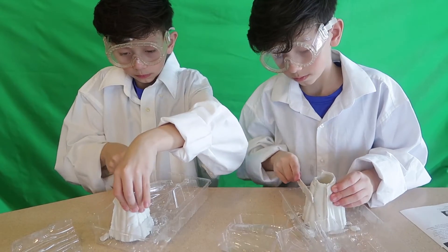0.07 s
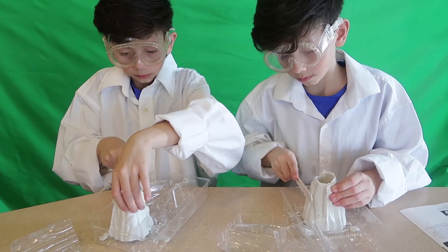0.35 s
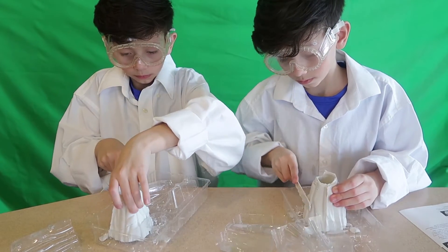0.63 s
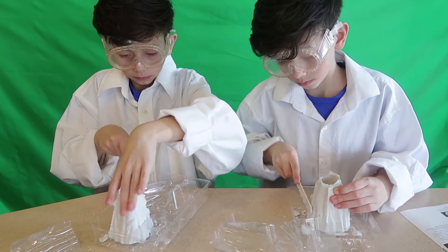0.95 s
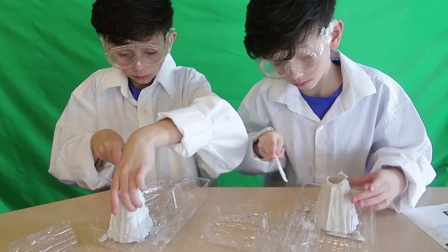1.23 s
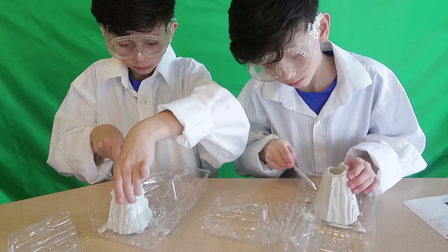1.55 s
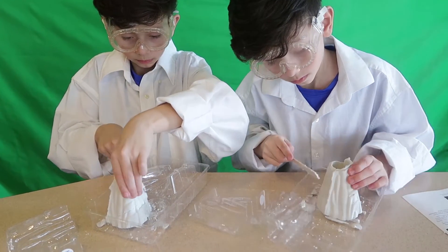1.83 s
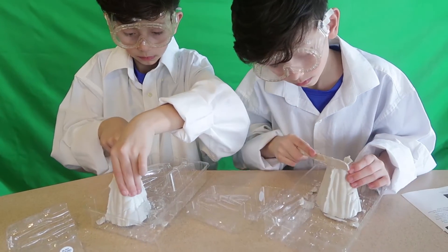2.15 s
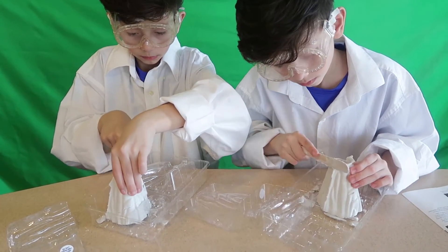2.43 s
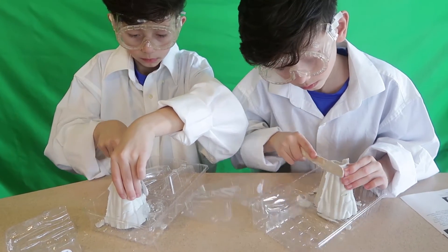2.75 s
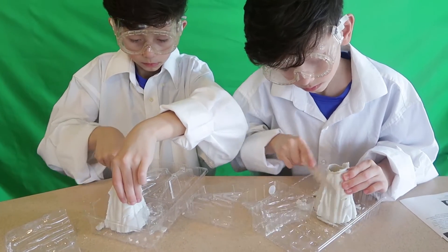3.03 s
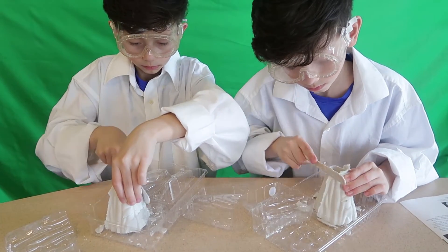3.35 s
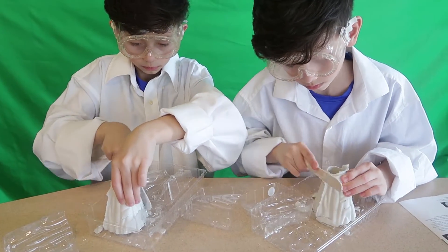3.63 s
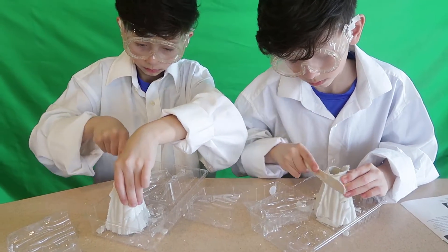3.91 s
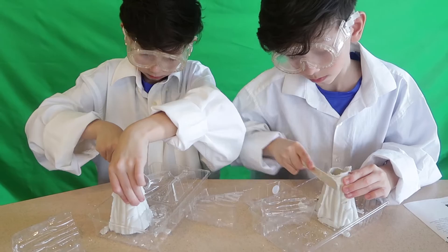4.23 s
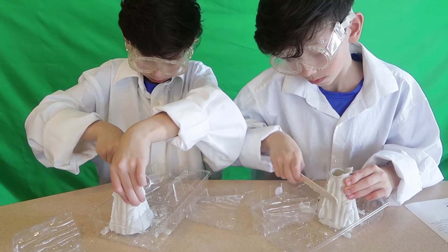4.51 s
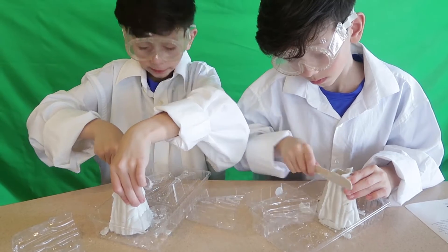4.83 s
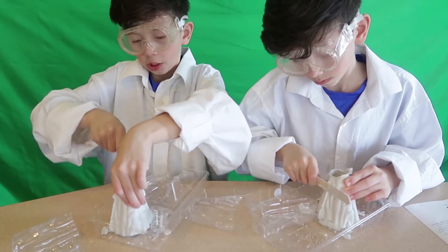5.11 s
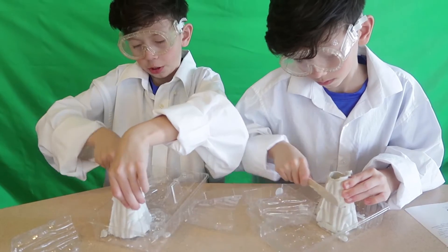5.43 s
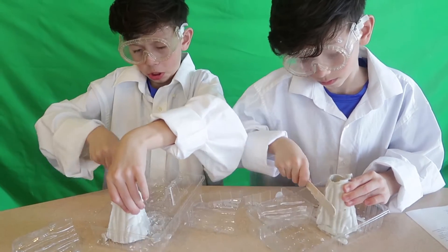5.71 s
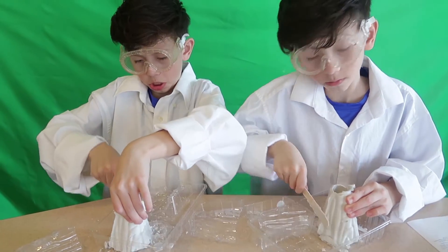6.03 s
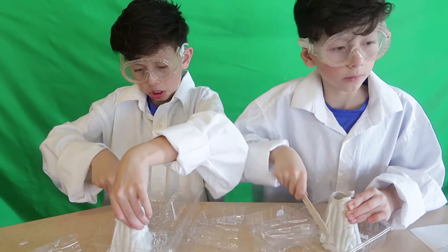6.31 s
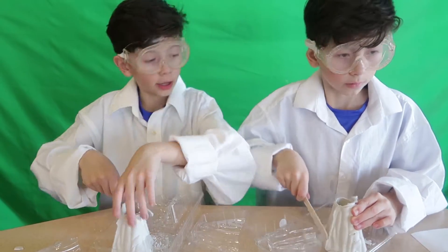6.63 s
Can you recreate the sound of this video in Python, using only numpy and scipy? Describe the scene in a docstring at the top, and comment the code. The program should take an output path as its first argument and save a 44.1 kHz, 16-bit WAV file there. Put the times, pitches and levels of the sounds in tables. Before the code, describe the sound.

Wooden sticks scrape dry plaster in short, gritty strokes, with sharp snaps, small taps and crinkling plastic in a small room.

```python
"""Dry, gritty scraping and sharp snaps: two wooden sticks work at plaster casts in thin plastic trays.
Each stroke is a run of tiny slips that sometimes squeaks; now and then a stick snaps off a ridge and
knocks the tray, the hardest knocks overloading the close microphone. The casts rock with hollow bumps,
the table thumps and the trays crinkle. A small live room answers, over a faint mains drone and a low
hum that comes and goes."""
import sys
import numpy as np
from scipy import signal
from scipy.fft import rfft, irfft, next_fast_len
from scipy.io import wavfile
from scipy.ndimage import map_coordinates

SR = 44100
rng = np.random.default_rng(int(sys.argv[2]) if len(sys.argv) > 2 else 0)


def output_pcm(signal):
    """Save a mono or channel-first signal as 16-bit PCM at the path in sys.argv[1].

    Samples are clipped to [-1, 1] before scaling.
    """
    pcm = np.clip(np.atleast_2d(signal).T, -1, 1) * 32767
    wavfile.write(sys.argv[1], SR, np.round(pcm).astype(np.int16))


N = 298113

# Stereo width of the room's answer. Each row: frequency in Hz, side level against mid in dB.
ROOM_WIDTH = [(60, -30), (110, -46), (200, -55), (380, -18), (700, -33), (1290, -19.5), (2380, -12.5),
              (4400, -6.5), (8120, -1), (15000, 5)]
SWELL_SHARE = 0.23  # an ordinary stroke swells over this share of its length
CREST_DB = 22.5  # a knock's peak stands about this far over its rms


def scraping(usual_pressure_db=-43.5):
    """Stroke after stroke: a light touch hisses and bumps, a firm one bites sooner and has more body."""
    # Each row: start in seconds, length in seconds, pressure in dB, extra grit of that patch in dB.
    strokes = [(0.0, 0.0098, -36.5, 5), (0.096, 0.054, -61.5, 5.5), (0.257, 0.037, -59, 4.5),
               (0.37, 0.054, -50.5, 0), (0.555, 0.091, -52, 1.5), (0.638, 0.023, -39, 6.5),
               (0.682, 0.082, -31, 2.5), (0.79, 0.14, -31, 0), (0.979, 0.14, -30, 2),
               (1.165, 0.069, -32.5, -2.5), (1.797, 0.13, -47.5, 6.5), (1.861, 0.058, -35, -6),
               (1.962, 0.031, -41.5, -3), (2.075, 0.023, -64, -24), (2.49, 0.14, -48.5, -1),
               (2.643, 0.031, -32, -11), (2.791, 0.031, -43, 1.5), (2.849, 0.036, -33.5, 5),
               (2.888, 0.17, -30.5, 4), (2.973, 0.019, -23.5, -1), (3.587, 0.091, -53, -3),
               (3.77, 0.043, -45, -2), (3.868, 0.11, -46, -8), (4.03, 0.038, -48, -1.5),
               (4.205, 0.042, -47.5, -6), (4.29, 0.066, -41, 2), (4.511, 0.026, -30.5, -9),
               (4.834, 0.054, -56.5, -9), (5.429, 0.13, -51, -3), (5.491, 0.041, -43, 4),
               (5.708, 0.076, -36.5, 3), (5.868, 0.14, -47.5, 1), (5.997, 0.072, -36.5, 2.5),
               (6.088, 0.051, -65, -9), (6.232, 0.16, -41.5, 2.5), (6.404, 0.052, -51, -0.5),
               (6.48, 0.25, -56.5, -0.5), (6.627, 0.053, -43.5, -2.5), (6.715, 0.024, -37, 2)]
    out = np.zeros((2, N))
    for start, length, pressure_db, extra_grit_db in strokes:
        harder_db = pressure_db - usual_pressure_db
        thud_db = -6 - 0.58 * harder_db
        grit_db = -8 - 0.63 * harder_db + extra_grit_db
        swell = np.clip(SWELL_SHARE - 0.0086 * harder_db, 0.05, 0.9)
        stroke = amp(pressure_db) * scrape(length, thud_db, grit_db, swell)
        add(out, start, in_room(stroke, wet_db=-1.5, lead_s=-14e-6))
    return out


def scrape(length, thud_db, grit_db, swell, release_s=0.035, powder_db=-4, judder_db=2, crumb_db=6):
    """The stick catches and slips on grains of plaster; crushed powder hisses and crumbs crack off."""
    # Tone of scraped plaster. Each row: frequency in Hz, level in dB.
    plaster_spectrum = [(53, -76), (90, -1.5), (335, -3), (381, -3), (493, -11), (1090, -3), (1270, -6.5),
                        (1870, -11), (2130, -14), (2700, -14), (2880, -16.5), (6680, -21), (12500, -30),
                        (15500, -60)]
    t = np.arange(0, length + release_s, 1 / SR)
    slips = unit(rattle(t, per_s=620))
    powder = amp(powder_db) * rng.standard_normal(len(t))
    force = (slips + powder) * amp(judder_db * wobble(56.7, len(t)))
    thud, body, grit = registers(tray(coloured(force, plaster_spectrum), ring_db=-10.5))
    grit = unit(grit + amp(crumb_db) * crumbs(t))
    easing = amp(2.5 * (0.5 - t / length))  # the hand eases off along the stroke
    touch = gate(t, length, swell * length, release_s) * easing
    return touch * (amp(thud_db) * thud + body + amp(grit_db) * grit)


def crumbs(t, per_s=55, pitch_hz=3600, pitch_spread=0.324, ring_t60=0.0061, scatter_db=10.5):
    """Crumbs of plaster crack off at random, each with a tiny ring of its own pitch."""
    out = np.zeros(len(t))
    for start in t[rng.random(len(t)) < per_s / SR]:
        pitch, size = np.clip(rng.standard_normal(2), -2, 2)
        hz = pitch_hz * np.exp(pitch_spread * pitch)
        age = np.maximum(t - start, 0)
        out += amp(scatter_db * size) * decay(age, ring_t60) * np.sin(2 * np.pi * hz * age)
    return out


def squeaking(edge_s=0.0061, waver_share=0.042, flutter_db=6):
    """For a moment the slips lock to the ring of the stick and make a rough, unsteady tone."""
    # Squeaks on smooth patches. Each row: start in seconds, length in seconds, pitch in Hz, level in dB.
    squeaks = [(0.686, 0.035, 1108, -35), (0.782, 0.038, 1118, -28), (0.898, 0.046, 1076, -30),
               (0.987, 0.092, 1060, -29), (2.993, 0.016, 2650, -29), (4.439, 0.04, 3900, -55),
               (6.654, 0.041, 1144, -43)]
    out = np.zeros((2, N))
    for start, length, hz, db in squeaks:
        t = np.arange(0, length + edge_s, 1 / SR)
        phase = 2 * np.pi * np.cumsum(hz * (1 + waver_share * wobble(260, len(t)))) / SR
        tone = unit(np.sin(phase) * amp(flutter_db * wobble(134, len(t))))
        add(out, start, in_room(amp(db) * tone * gate(t, length, edge_s, edge_s), wet_db=-8))
    return out


def breaking(bite_s=0.04, lead_s=18e-6):
    """The stick digs in and snaps off a ridge with one short crack and a grainy tail."""
    # Each row: time of the snap in seconds, rough peak in dB, pitch in Hz, thud and grit in dB against
    # the body, level of the bite before it in dB, level of the tail after it in dB.
    breaks = [(3.0655, 0, 1110, -9.5, -12, -42, -7), (3.8326, -6.5, 1040, -20, -12, -41, -13),
              (4.512, -10.5, 990, -16, -10, -46.5, -12.5), (4.9785, 4, 1060, -11.5, -10, -41.5, -1),
              (5.619, 5, 910, -11, -11.5, -43, -5), (6.189, 1.5, 816, -11.5, -15.5, -43, -6)]
    out = np.zeros((2, N))
    for start, db, hz, thud_db, grit_db, bite_db, tail_db in breaks:
        bite = amp(bite_db) * scrape(bite_s, thud_db=0.5, grit_db=-5, swell=SWELL_SHARE)
        snap = amp(db) * knock(hz, thud_db, grit_db, stick_db=7, stick_q=3.7, ring_db=-10,
                               chatter_db=-11, chatter_t60=0.019, crunch_t60=0.027, crunch_hz=4200)
        add(out, start - bite_s, in_room(bite, wet_db=-5, lead_s=lead_s))
        add(out, start, in_room(snap, wet_db=-9, lead_s=lead_s))
        add(out, start, in_room(amp(tail_db) * snap_tail(), wet_db=-3, lead_s=lead_s))
    return out


def snap_tail(t60=0.094, rise_s=0.0041):
    """A short, dense, grainy tail after each snap, with its first reflections."""
    # Tone of the tail. Each row: frequency in Hz, level in dB.
    tail_spectrum = [(40, -29), (130, -10), (270, -4), (390, -2), (500, -5), (780, -1), (1150, 1.5),
                     (1750, -2.5), (2350, -7.5), (3200, -16), (6000, -22.5), (12000, -37), (15500, -65)]
    t = np.arange(SR // 6) / SR
    grains = rattle(t, per_s=1400) * rise(t, rise_s) * decay(t, t60)
    return amp(-CREST_DB) * unit(tray(coloured(grains, tail_spectrum), ring_db=-9))


def ticking():
    """Short ticks and taps of a stick on the cast, one of them a close echo right after a snap."""
    # Each row: start in seconds, rough peak in dB, pitch in Hz, thud and grit in dB against the body.
    ticks = [(0.37, -33.5, 1060, -7, -29), (.631, -16.5, 940, -0.5, -18), (.688, -23, 1140, -5, -15),
             (.7835, -7, 1120, -14.5, -11), (.813, -16.5, 1150, -11, -15), (.836, -14, 1120, -10, -5.5),
             (0.868, -17, 1110, -14, -11), (1.03, -14.5, 1080, -20, -21), (1.065, -8, 1000, -15, -16.5),
             (1.133, -17, 1500, -17, -16), (1.221, -29, 940, 2, -22), (1.861, -20, 1310, -30, -32),
             (1.89, -17, 804, -12, -20), (1.968, -24, 1380, -5, -13), (2.219, -31.5, 595, 8.5, -6),
             (2.342, -32.5, 794, 4, -6.5), (2.398, -28, 1190, -11, -27), (2.49, -21, 920, -6, 0),
             (2.522, -23.5, 1180, -27, -9), (2.566, -21, 1320, -32, -28), (2.651, -18, 2330, -16, 3),
             (2.677, -24.5, 1190, -30, -2), (2.854, -21.5, 1060, -17, -8), (2.9, -21.5, 1090, -8, 4),
             (2.972, -6, 1200, -11.5, -6), (3.073, -6, 710, -4, -10.5), (4.163, -28.5, 2100, -10, -7),
             (4.171, -31, 2080, -1, -10), (4.206, -30.5, 1950, 10, 9), (4.276, -28.5, 1900, 9, -3),
             (4.345, -21, 1400, -1.5, -6), (4.384, -25, 670, 4, 3.5), (4.577, -20, 900, -3, -6),
             (4.909, -24, 875, -2, 1.5), (5.054, -9, 900, -6, -8.5), (5.061, -13.5, 850, -9, -12),
             (5.088, -15, 690, -6, -5), (5.111, -12.5, 805, -6, -14), (5.711, -12, 970, 0, -9.5),
             (5.743, -23, 1010, 8, -18), (5.762, -17, 680, 8, -15), (5.814, -21, 1170, -9, -13),
             (5.962, -26.5, 1490, -20, -9), (6.116, -28.5, 1150, -13, 16), (6.1864, -7.5, 1280, -9.5, -6.5),
             (6.251, -14.5, 1140, -13, -30), (6.354, -18.5, 720, -12, -20), (6.637, -29, 786, -2, 3),
             (6.728, -25, 2400, -13, -2)]
    out = np.zeros((2, N))
    for start, db, hz, thud_db, grit_db in ticks:
        tick = knock(hz, thud_db, grit_db, stick_db=11.5, stick_q=3.26, ring_db=-14.5,
                     chatter_db=-1.5, chatter_t60=0.092, crunch_t60=0.033, crunch_hz=1800)
        add(out, start, in_room(amp(db) * tick, wet_db=-4, lead_s=-15e-6))
    return out


def knock(hz, thud_db, grit_db, stick_db, stick_q, ring_db,
          chatter_db, chatter_t60, crunch_t60, crunch_hz):
    """A push, a bright crunch of plaster and a duller chatter ring the stick briefly. Peak near 1."""
    # Tone of a knock. Each row: frequency in Hz, level in dB.
    knock_spectrum = [(35, -43), (70, -11.5), (180, -4.5), (250, 1), (385, -2.5), (480, -8.5), (780, 2),
                      (1050, -2), (1300, -1), (1560, -2), (1830, 0), (2100, -8.5), (3930, -11),
                      (10700, -27), (15500, -39.5)]
    t = np.arange(SR // 6) / SR
    push = unit(t == 0)
    crunch = rng.standard_normal(len(t)) * decay(t, crunch_t60)
    crunch = filtered(crunch, lambda f: 1j * f / (crunch_hz + 1j * f))  # high-pass
    chatter = rattle(t, per_s=800) * decay(t, chatter_t60)
    chatter = filtered(chatter, lambda f: 2400 / (2400 + 1j * f))  # low-pass
    force = push + amp(3) * unit(crunch) + amp(chatter_db) * unit(chatter)
    stick = filtered(force, lambda f: 1 + amp(stick_db) * resonance(f, hz, hz / stick_q))
    thud, body, grit = registers(tray(coloured(stick, knock_spectrum), ring_db))
    return amp(-CREST_DB) * unit(amp(thud_db) * thud + body + amp(grit_db) * grit)


def tray(x, ring_db):
    """A contact is heard directly and through the modes of the cast and its tray."""
    # Each row: frequency in Hz, bandwidth in Hz, level in dB.
    tray_modes = [(390, 15, 9), (1060, 40, 1), (1886, 63, -2), (2560, 28, -14), (3880, 1300, 2.5)]
    return filtered(x, lambda f: 1 + amp(ring_db) * modes(f, tray_modes))


def lingering_ring(start_s=1.24, level_db=-40, rise_s=0.0089, t60=0.38):
    """A faint, thin ring dies away as the stick leaves the cast after the first long scrape."""
    # Each row: frequency in Hz, bandwidth in Hz, level in dB.
    ring_modes = [(2240, 71, -5), (2590, 110, 4), (3830, 81, 0), (4070, 100, -9)]
    out = np.zeros((2, N))
    t = np.arange(SR) / SR
    ring = unit(filtered(diffuse(SR, ROOM_WIDTH), lambda f: modes(f, ring_modes)))
    add(out, start_s, amp(level_db) * ring * rise(t, rise_s) * decay(t, t60))
    return out


def bumping(t60=0.15, width_hz=380, hollow_db=-1):
    """The cast rocks on its tray; the soft contact has no crack and only wakes the low modes."""
    # Each row: start in seconds, peak in dB, pitch in Hz.
    bumps = [(1.225, -28, 230), (1.262, -48, 260), (2.086, -39, 780), (2.342, -44, 216.5),
             (3.545, -29.5, 515), (3.566, -42, 590), (3.727, -34.5, 360), (6.167, -30, 403)]
    # Modes of the hollow cast. Each row: frequency in Hz, bandwidth in Hz, level in dB.
    hollow = [(295, 19, 16), (412, 15, 2), (580, 9.6, -17)]
    out = np.zeros((2, N))
    for start, db, hz in bumps:
        bump = burst(t60, lambda f: resonance(f, hz, width_hz) ** 2
                     * (1 + amp(hollow_db) * modes(f, hollow)))
        add(out, start, in_room(amp(db) * bump, wet_db=-5))
    return out


def thumping(rise_s=0.0092, t60=0.29):
    """A hand bears down and the table top swings for a few slow cycles, dead centre."""
    # Each row: start in seconds, peak in dB, pitch in Hz.
    thumps = [(1.255, -43, 65.3), (3.02, -44, 66.5), (4.272, -40, 57.5), (5.591, -41, 55),
              (6.171, -42, 100)]
    out = np.zeros((2, N))
    t = np.arange(SR // 2) / SR
    for start, db, hz in thumps:
        swing = np.sin(2 * np.pi * hz * t) * rise(t, rise_s) * decay(t, t60)
        add(out, start, amp(db) * swing[None] / np.abs(swing).max())
    return out


def crinkling(t60=0.022, width_hz=2200):
    """The thin plastic of a tray buckles with small dry pops that have no bass."""
    # Each row: start in seconds, peak in dB, pitch in Hz.
    crinkles = [(2.026, -43, 3460), (2.808, -36, 3800), (2.936, -29, 5500), (2.952, -22, 5000),
                (3.053, -21, 3480), (3.403, -37.5, 2900), (3.532, -39.5, 3300), (3.601, -41, 4250),
                (3.618, -49, 4800), (3.720, -35, 3150), (3.774, -35.5, 3980), (3.911, -29.5, 3460),
                (3.982, -39, 3430), (4.041, -40, 3770), (4.163, -37.5, 7000), (4.274, -37.5, 3400),
                (4.296, -32.5, 2940), (4.384, -42, 3840), (4.434, -32, 3830), (5.583, -26, 3300),
                (5.814, -35, 3380), (5.884, -39, 5500), (6.504, -37.5, 3200), (6.637, -37, 4200),
                (6.719, -28, 3200)]
    out = np.zeros((2, N))
    for start, db, hz in crinkles:
        pop = burst(t60, lambda f: resonance(f, hz, width_hz) ** 2)
        add(out, start, in_room(amp(db) * pop, wet_db=-2))
    return out


def in_room(x, wet_db, lead_s=0, build_up_s=0.00065):
    """Direct sound, the left side ahead by lead_s, plus a room tail new for each contact."""
    # Decay of the small room. Each row: frequency in Hz, seconds to fall by 60 dB.
    reverb_times = [(100, 0.66), (700, 0.54), (1900, 0.55), (5000, 0.47), (12000, 0.54)]
    hz, t, noise = signal.stft(diffuse(SR * 3 // 4, ROOM_WIDTH), SR, nperseg=256)
    fade = decay(t, along(reverb_times, hz)[:, None])
    tail = signal.istft(noise * fade * rise(t, build_up_s), SR, nperseg=256)[1]
    tail /= np.linalg.norm(tail.mean(axis=0))
    out = amp(wet_db) * signal.fftconvolve(x[None], tail, axes=1)
    out[:, :len(x)] += filtered(x, lambda f: np.exp(np.pi * 1j * f * lead_s * np.array([[1], [-1]])))
    return out


def low_hum(edge_s=0.015, fade_db_per_s=7, sag_s=0.057, sag_share=0.2):
    """A nearly pure low tone comes in twice, wavers, fades slowly and sags in pitch at its end."""
    # Each row: start in seconds, length in seconds, pitch in Hz, opening level in dB.
    hums = [(1.747, 0.495, 134.1, -44), (2.494, 0.32, 126.3, -52)]
    out = np.zeros(N)
    for start, length, hz, db in hums:
        t = np.arange(N) / SR - start
        sag = np.clip(1 + (t - length) / sag_s, 0, 1)
        phase = 2 * np.pi * np.cumsum(hz * (1 - sag_share * sag)) / SR
        level = gate(t, length, edge_s, edge_s) * amp(db - fade_db_per_s * t + 0.87 * wobble(10.2, N))
        out += level * np.sqrt(2) * (np.sin(phase) + amp(-16) * np.sin(2 * phase))
    return out


def background(hiss_db=-53, mains_hz=59, mains_db=-58):
    """Steady background hiss of room and microphone, and a slightly unsteady mains drone."""
    # Tone of the hiss. Each row: frequency in Hz, level in dB.
    hiss_spectrum = [(12, -38), (20, -8), (64, -6.5), (126, -12.5), (175, -13), (306, -10.5), (342, -14.5),
                     (519, -14.5), (833, -16), (984, -20), (3440, -27.5), (11400, -40), (13500, -43),
                     (15500, -73)]
    # Stereo width of that hiss. Each row: frequency in Hz, side level against mid in dB.
    hiss_width = [(60, -36), (110, -11), (200, -7), (380, -3), (700, -7.5), (1290, -2.5), (2380, -3.5),
                  (4400, -1), (8120, -2), (15000, 0)]
    hiss = unit(filtered(diffuse(N, hiss_width), lambda f: amp(along(hiss_spectrum, f))))
    phase = 2 * np.pi * mains_hz * np.arange(N) / SR + 0.5 * wobble(4.1, N)
    drone = np.sqrt(2) * (np.sin(phase) + amp(-2.5) * np.sin(2 * phase))
    return amp(hiss_db) * hiss + amp(mains_db + 2.3 * wobble(3.12, N)) * drone


def diffuse(size, width):
    """Stereo noise that follows a width curve: centred in the bass, wide in the treble."""
    mid, side = rng.standard_normal((2, size))
    side = filtered(side, lambda f: amp(along(width, f)))
    return np.array([mid + side, mid - side])


def rattle(t, per_s, scatter_db=3):
    """Separate clicks of uneven strength at random moments."""
    hits = rng.random(len(t)) < per_s / SR
    strength = amp(scatter_db * np.clip(rng.standard_normal(len(t)), -2, 2))
    return hits * strength * rng.choice([-1, 1], len(t))


def burst(t60, response):
    """A short dying burst of noise through a response, at peak 1."""
    t = np.arange(SR // 5) / SR
    sound = filtered(rng.standard_normal(len(t)) * decay(t, t60), response)
    return sound / np.abs(sound).max()


def registers(x, thud_hz=470, grit_hz=2750):
    """Low thud, middle body and high grit of a contact, each at rms 1."""
    cuts = [(thud_hz, "low"), ([thud_hz, grit_hz], "band"), (grit_hz, "high")]
    return [unit(signal.sosfilt(signal.butter(4, hz, kind, fs=SR, output="sos"), x))
            for hz, kind in cuts]


def resonance(f, hz, width):
    """Response of one damped mode."""
    return 1j * f * width / (hz * hz - f * f + 1j * f * width)


def modes(f, table):
    """Summed response of a table of damped modes."""
    return sum(amp(db) * resonance(f, hz, width) for hz, width, db in table)


def coloured(x, spectrum, size=2048):
    """x through the minimum-phase filter that has this spectrum."""
    gain_db = np.maximum(along(spectrum, np.fft.rfftfreq(size, 1 / SR)), -100)
    cepstrum = irfft(np.log(amp(gain_db)))
    cepstrum[1:size // 2] *= 2
    cepstrum[size // 2 + 1:] = 0
    return signal.fftconvolve(x, irfft(np.exp(rfft(cepstrum))))[:len(x)]


def filtered(x, response):
    """x through a frequency response."""
    size = x.shape[-1]
    padded = next_fast_len(size + SR // 10)
    return irfft(rfft(x, padded) * response(np.fft.rfftfreq(padded, 1 / SR)), padded)[..., :size]


def along(points, hz):
    """A curve through the points, read on a log frequency axis."""
    freqs, values = np.transpose(points)
    return np.interp(np.log(hz + 1), np.log(freqs + 1), values)


def wobble(rate, size):
    """A smooth random curve, rate knots a second."""
    knots = rng.standard_normal(int(size * rate / SR) + 4)
    return map_coordinates(knots, [np.arange(size) * rate / SR])


def gate(t, length, attack, release):
    """Attack, hold until length, release."""
    return np.clip(np.minimum(t / attack, 1 + (length - t) / release), 0, 1)


def rise(t, rise_s):
    """A soft onset with time constant rise_s."""
    return 1 - np.exp(-t / rise_s)


def decay(t, t60):
    """A fall of 60 dB every t60 seconds."""
    return amp(-60 * t / t60)


def amp(db):
    """Decibels to gain."""
    return 10 ** (np.asarray(db) / 20)


def unit(x):
    """x at rms 1."""
    return x / np.sqrt(np.mean(x ** 2) + 1e-20)


def add(track, start_s, sound):
    """Mix a sound into the track at start_s."""
    start = max(round(start_s * SR), 0)
    part = track[:, start:start + sound.shape[1]]
    part += sound[:, :part.shape[1]]


def scene():
    """Sticks on plaster in front; casts, table and trays around them; hum and hiss beneath."""
    sticks = scraping() + squeaking() + breaking() + ticking() + lingering_ring()
    return sticks + bumping() + thumping() + crinkling() + low_hum() + background()


def record(dry, ceiling=0.93, hardness=8, top_hz=15500):
    """The microphone flattens the hardest peaks; the treble is cut steeply above top_hz."""
    flattened = dry / (1 + np.abs(dry / ceiling) ** hardness) ** (1 / hardness)
    return filtered(flattened, lambda f: 1 / (1 + (f / top_hz) ** 80))


dry = scene()
out = record(dry)
output_pcm(out)
```